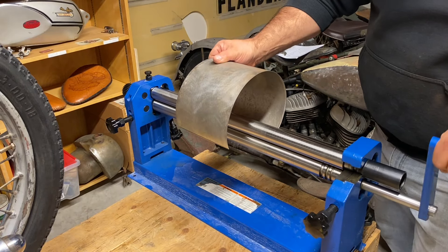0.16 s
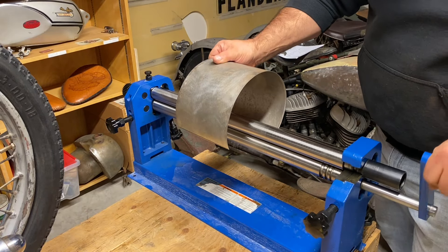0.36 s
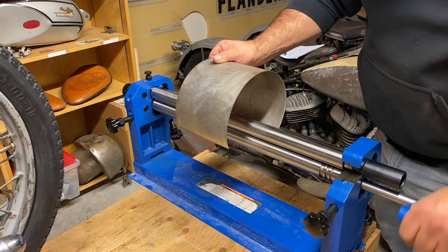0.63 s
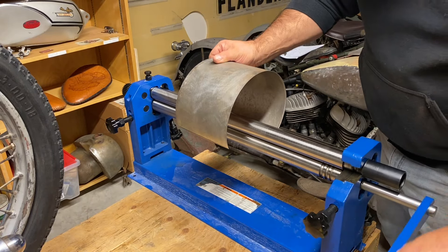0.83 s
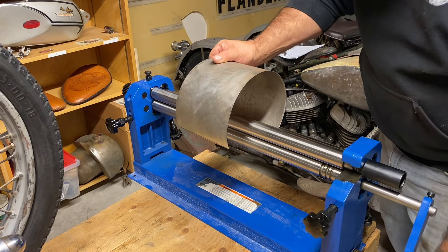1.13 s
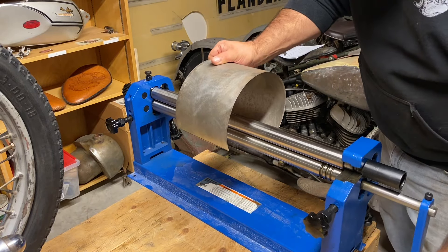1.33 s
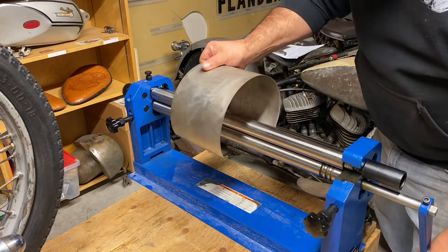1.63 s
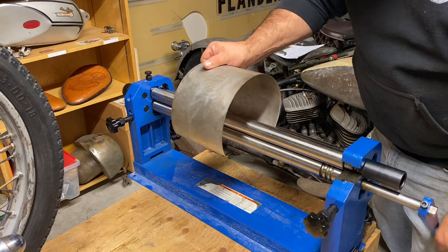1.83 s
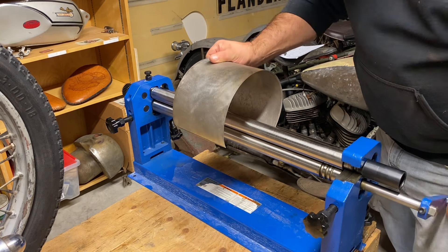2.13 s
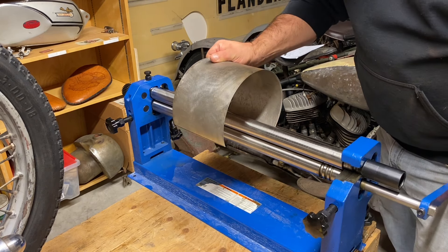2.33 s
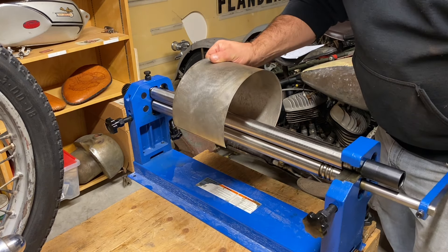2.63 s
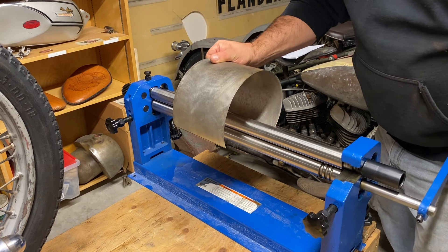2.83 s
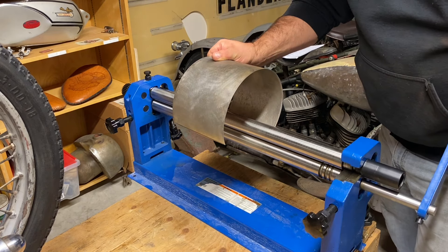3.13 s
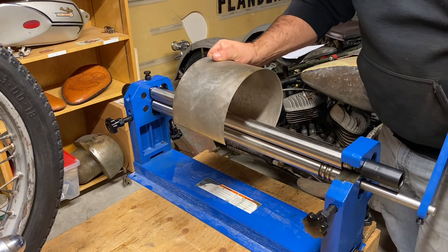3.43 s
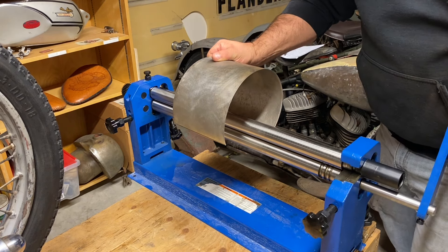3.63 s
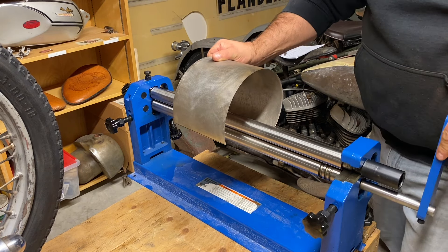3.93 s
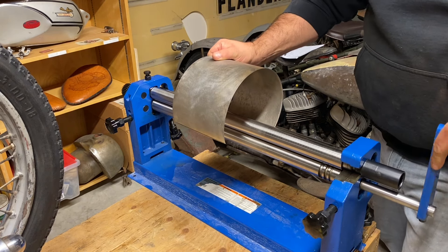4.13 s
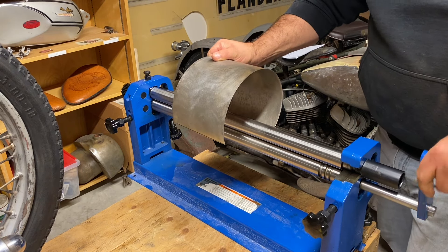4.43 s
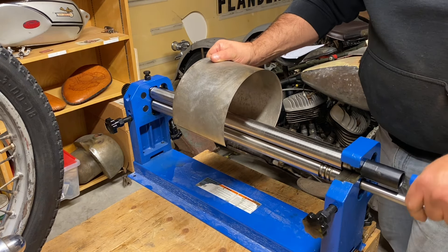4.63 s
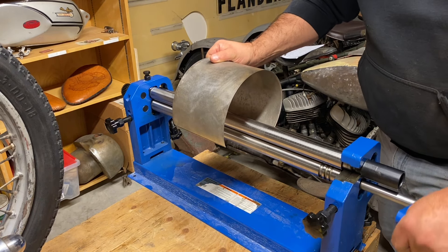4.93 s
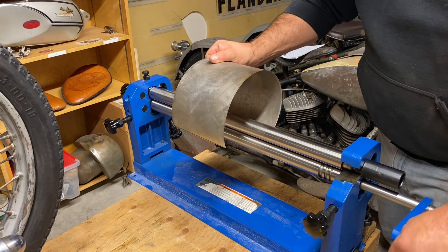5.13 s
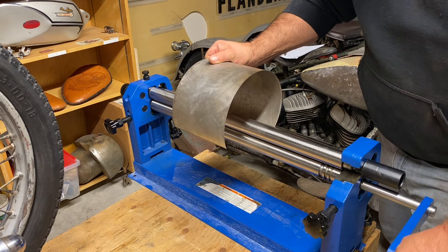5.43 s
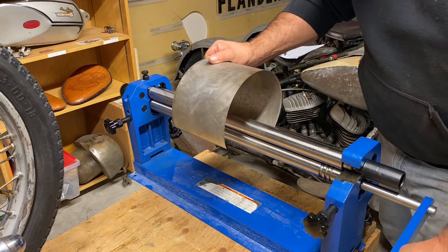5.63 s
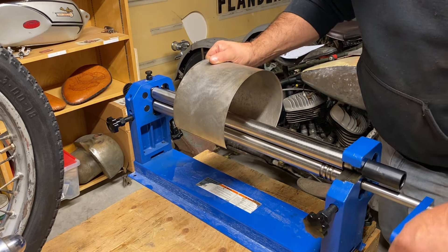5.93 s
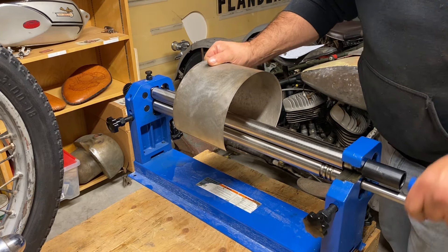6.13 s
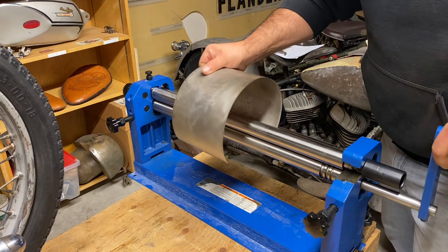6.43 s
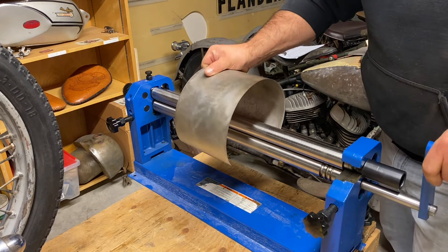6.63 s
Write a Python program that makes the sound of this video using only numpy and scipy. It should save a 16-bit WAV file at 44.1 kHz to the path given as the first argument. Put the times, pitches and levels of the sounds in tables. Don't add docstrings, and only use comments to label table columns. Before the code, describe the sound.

A close stereo pickup in a small, briefly reverberant workshop, with a low electrical hum around 120 Hz, faint motor whine and a soft bench rumble throughout. It opens with a click and dull jolt, then quiet rubbing and small ticks. From about 0.9 to 1.95 s comes a dense clatter: firm clacks, hollow thin-sheet knocks, boomy roller lurches and bright, dry edge rattles, thickest around 1.3 to 1.9. A faint tick at 2.1, then a medium clack and knock at 2.7. Between 3.5 and 5.5 s, isolated gear clicks and hollow thuds are spaced apart over soft palm hiss and hollow drumming. At 5.8 s the roller lurches hard with the loudest clack and a bright rattle. Sliding hiss and coarse scuffing rise around 6.0; a short gritty skid swells at 6.4 to 6.55, ending in a sharp click and light knock, then rubbing fades.

```python
import sys
import numpy as np
from scipy import signal
from scipy.fft import rfft, irfft, next_fast_len
from scipy.io import wavfile
from scipy.ndimage import uniform_filter1d, map_coordinates

SR = 44100
rng = np.random.default_rng(int(sys.argv[2]) if len(sys.argv) > 2 else 0)


def wav_out(sig):
    wavfile.write(sys.argv[1], SR, np.round(np.clip(np.atleast_2d(sig).T, -1, 1) * 32767).astype(np.int16))


def ratio_of_db(decibels):
    return 10 ** (np.asarray(decibels, float) / 20)


N = 298557
LEAD = 128

# start_s, peak_db, sizzle_db, ring_hz
GEAR_TEETH = [(0.0, -37.5, -24, 2040), (0.8927, -47, -6, 2230), (1.4273, -30, -20, 3000),
              (3.3034, -64.5, -14, 2030), (3.3987, -58.5, -42, 1850), (3.5353, -37, 0, 2420),
              (3.6724, -34, 3.5, 2440), (4.0351, -34, 1.5, 3090), (4.6854, -55.5, -8, 1730),
              (4.9392, -45.5, 1, 1628), (5.4445, -64, -21, 2630), (5.5648, -69, -18.5, 2090),
              (5.6083, -72, -29.5, 2460), (5.7985, -31.5, -26, 2180), (5.8236, -29.5, -5.5, 2120)]
# start_s, peak_db, ring_hz, edge_db, boom_db
SHEET_RAPS = [(0.983, -22, 288, -10.5, -11), (1.22, -44.5, 392, 3, 5.5), (1.359, -26, 335, -9, -6),
              (1.465, -31.5, 307, -14, -1.5), (1.52, -37.5, 249, -3, -17), (1.569, -55, 269, -16, -15),
              (1.603, -46, 367, 2, -10), (1.784, -52, 526, 11, 0), (1.904, -41.5, 444, 3.5, -5),
              (2.694, -32, 586, -1.5, -7), (3.534, -41.5, 566, 3.5, -7.5), (3.672, -37, 660, 3.5, -10),
              (4.044, -26.5, 354, -6.5, -4.5), (4.479, -30.5, 285, -19.5, -9.5), (4.938, -28, 274, -6, -17),
              (5.144, -35.5, 557, -39, -5.5), (5.445, -32, 366, -30.5, -6),
              (5.799, -20.5, 572, -14.5, -7.5), (6.551, -40, 487, -12, -13)]
# start_s, peak_db, ring_hz, edge_db, boom_db
FRAME_JOLTS = [(0.0, -33.5, 345, -7, 3.5), (0.475, -39, 294, -13.5, 2), (0.689, -44, 320, -16, 8),
               (0.741, -50.5, 307, -35, -3), (0.801, -62, 307, -24, 9), (1.294, -29, 350, -8, 0),
               (1.4, -34.5, 308.6, -31, -1), (1.93, -40.5, 228, -17, 3.5), (2.703, -31, 265, -27, 2.5),
               (3.862, -29, 286, -33, -6), (3.884, -44.5, 567, -9.5, -5), (4.079, -35.5, 567, -8.5, -3),
               (4.264, -47.5, 290, -33, 7.5), (4.691, -49, 307, -11, 4), (4.72, -56, 277, -17, -3),
               (6.466, -48.5, 580, 3, 4), (6.5, -41, 266, -3, -6)]
# start_s, peak_db, ring_hz, edge_db, boom_db
ROLLER_LURCHES = [
    (0.942, -31.5, 285, -12, 3.5),
    (1.019, -27, 283, -9.5, -6.5),
    (1.058, -32, 273, -8.5, 2.5),
    (1.436, -24.5, 289, -20, -2),
    (5.812, -24, 191, -30, 1),
    (5.843, -19, 356, -5.5, -4.5),
]


def unit(x):
    return x / np.sqrt(np.mean(x ** 2, -1, keepdims=True) + 1e-20)


def along(points, hz):
    f, v = np.transpose(points)
    return np.interp(np.log(hz + 1), np.log(f + 1), v)


def curves(rows):
    s, *cols = np.transpose(rows)
    return [np.interp(np.arange(N) / SR, s, c) for c in cols]


def wobble(rate):
    knots = rng.standard_normal(int(N * rate / SR) + 4)
    return map_coordinates(knots, [np.arange(N) * rate / SR])


def filtered(x, response):
    n = x.shape[-1]
    m = next_fast_len(n + 2048)
    return irfft(rfft(x, m) * response(np.fft.rfftfreq(m, 1 / SR)), m)[..., :n]


def peak(f, hz, width_hz):
    return 1j * f * width_hz / (hz * hz - f * f + 1j * f * width_hz)


def body(modes, f):
    total = 0
    for k, (hz, width_hz, db) in enumerate(modes):
        total = total + (-1) ** k * ratio_of_db(db + rng.normal(0, 2.48)) * peak(f, hz, width_hz)
    return total


def spread(pair, colour):
    # frequency_hz, likeness (0 to 1)
    likeness = [(60, 0.91), (150, 0.85), (300, 0.73), (600, 0.28), (1200, 0.072), (2400, 0.59),
                (5000, 0.67), (7500, 0.83), (8300, 0.94)]

    def response(hz):
        angle = np.arccos(np.clip(along(likeness, hz), -1, 1)) / 2
        return colour(hz) * [np.cos(angle), np.sin(angle)]

    mid, side = filtered(pair, response)
    return np.array([mid + side, mid - side])


def rush(spectrum, patchy_db):
    z = signal.stft(rng.standard_normal((2, N)), nperseg=512)[2]
    field = uniform_filter1d(rng.standard_normal(z.shape[1:]), 6, 0)
    field = uniform_filter1d(field, 10, 1)
    pair = signal.istft(z * ratio_of_db(patchy_db * unit(field)), nperseg=512)[1][:, :N]
    return unit(spread(pair, lambda hz: ratio_of_db(along(spectrum, hz))))


def struck(t, t60, blow):
    chatter = ratio_of_db(-60 * t / np.clip(t60, .003, 1)) * rng.standard_normal(len(t))
    chatter[0] = blow
    return np.array([chatter, t == 0])


def shudder(hits, under_db, t60):
    kicks, t = np.zeros(N), np.arange(SR) / SR
    for s, db, *_ in hits:
        kicks[round(s * SR)] = ratio_of_db(2 * (db + under_db))
    return np.sqrt(abs(signal.fftconvolve(kicks, ratio_of_db(-120 * t / t60))[:N]))


def add(out, s, hit, room_db):
    # frequency_hz, t60_s
    room_decay = [(100, 0.6), (500, 0.39), (2000, 0.34), (6000, 0.25), (14000, 0.13)]
    hz, t, z = signal.stft(rng.standard_normal((2, SR // 3)), SR, nperseg=256)
    tail = signal.istft(z * ratio_of_db(-60 * t / along(room_decay, hz)[:, None]), SR, nperseg=256)[1]
    tail = ratio_of_db(room_db) * tail / np.linalg.norm(tail[0])
    tail = np.pad(tail, ((0, 0), (LEAD + 90, 0)))
    sound = signal.fftconvolve(hit[1:], tail, axes=1)
    sound[0, LEAD:][:hit.shape[1]] += hit[0]
    sound[1, LEAD + 12:][:hit.shape[1]] += rng.uniform(-0.66, 0.87) * hit[0]
    start = round(s * SR)
    out[:, start:start + sound.shape[1]] += spread(sound, np.ones_like)


def hum():
    # pitch_hz, level_db
    motor_lines = [(2750, -92.5), (2880, -100.5), (269, -78.5), (367, -75)]
    hum_hz, hum_db = 119.7, -55
    phase = 2 * np.pi * np.cumsum(hum_hz + 1.5 * wobble(8.7)) / SR
    tone = ratio_of_db(hum_db + 0.43 * wobble(7.5)) * np.sin(phase)
    for line_hz, line_db in motor_lines:
        phase = 2 * np.pi * np.cumsum(line_hz + 8 * wobble(25)) / SR
        tone += ratio_of_db(line_db + 6.7 * wobble(40)) * np.sin(phase)
    return np.sqrt(2) * tone


def rubbing():
    # start_s, hiss_db, coarseness_db
    strokes = [(0.0, -96, 20), (0.32, -74.5, 3.5), (1.3, -65.5, 5.5), (1.43, -60.5, 9), (1.75, -76, 8),
               (1.9, -66.5, 4), (2.36, -73, 3.5), (2.69, -69.5, -1), (3.11, -79, 2), (3.39, -77.5, 4.5),
               (3.69, -70.5, 9.5), (3.81, -78, 9.5), (4.58, -76, -2), (5.62, -88, 8.5), (5.81, -77.5, 8.5),
               (5.98, -65, 11), (6.2, -67.5, 3.5), (6.77, -75, 8)]
    # frequency_hz, density_db
    hiss_colour = [(2800, -36), (3800, 0.5), (5000, -1), (7200, -1.5), (9000, 1.5), (11000, -3),
                   (13500, -5.5), (15500, -6), (16400, -38)]
    # frequency_hz, density_db
    scuff_colour = [(600, -32), (900, 4), (1100, -1.5), (1600, -5.5), (2300, -5), (3000, -8), (3800, -13.5),
                    (5000, -48.5)]
    # frequency_hz, density_db
    drum_colour = [(88, -41), (150, -11), (280, 2), (344, -4.5), (377, -4), (536, -5.5), (587, -6.5),
                   (898, -11.5), (1300, -37), (1690, -51), (2860, -120)]
    # frequency_hz, density_db
    rumble_colour = [(25, -26.5), (40, -10.5), (60, -1.5), (85, -3), (140, -3), (190, -22), (260, -51.5)]
    # pitch_hz, width_hz, level_db
    streaks = [(2270, 18, -14), (2860, 29, 3), (3980, 150, -0.5), (4650, 130, 2.5), (5950, 27, -4.5),
               (6980, 300, -1), (7770, 310, -7.5), (9350, 100, -15.5), (11100, 73, -1.5),
               (11570, 240, -6.5)]

    hiss_db, coarse_db = curves(strokes)
    hiss = np.hypot(ratio_of_db(hiss_db), shudder(GEAR_TEETH, under_db=-28, t60=0.83))
    sliding = hiss * rush(hiss_colour, patchy_db=1.1)
    sliding = sliding + ratio_of_db(hiss_db + coarse_db) * rush(scuff_colour, patchy_db=2.5)
    ringing = filtered(sliding, lambda f: 0.65 + 0.69 * abs(body(streaks, f)))

    curl_db = -63.5 + 0.53 * (hiss_db - hiss_db.mean())
    curl = np.hypot(ratio_of_db(curl_db), shudder(ROLLER_LURCHES + FRAME_JOLTS, under_db=-28.5, t60=0.55))
    drum = curl * ratio_of_db(0.41 * wobble(17)) * rush(drum_colour, patchy_db=3.0)

    bench = np.hypot(ratio_of_db(-59.5), shudder(FRAME_JOLTS + SHEET_RAPS, under_db=-23, t60=0.8))
    return ringing + drum + bench * rush(rumble_colour, patchy_db=5.0)


def skid():
    # frequency_hz, density_db
    skid_colour = [(300, -38), (1000, -7), (3000, -7.5), (5500, -3), (8000, -5), (12000, -10), (15600, -8),
                   (16500, -49.5)]
    start_s, top_s, end_s, top_db = 6.372, 6.462, 6.548, -44
    rise_db, fall_db, bend = 17, 24, 1.7
    t = np.arange(N) / SR
    sounding = (t > start_s) & (t < end_s)
    away = np.interp(t, [start_s, top_s, end_s], [1, 0, 1])
    level_db = top_db - np.where(t < top_s, rise_db, fall_db) * away ** bend
    grit = ratio_of_db(2.5 * wobble(300) + 1.5 * wobble(60))
    return sounding * ratio_of_db(level_db) * unit(grit * rush(skid_colour, patchy_db=1.2))


def knocks():
    # pitch_hz, width_hz, level_db
    sheet_modes = [(280.5, 31, -2.5), (364, 20, -3), (435.7, 74, -5), (475, 83, -7.5), (552, 85, -7),
                   (699.6, 29, -8), (726, 49, -4.5)]
    # pitch_hz, width_hz, level_db
    bench_modes = [(62.6, 25, -2.5), (93, 116, -7.5), (137.2, 27, -0.5), (151, 84, -18)]
    out, t = np.zeros((2, N + SR)), np.arange(SR // 5) / SR

    def dull(f):
        return 1 / (1 + 1.1j * f / 720 - (f / 720) ** 2) ** 3

    def knock(s, db, ring_hz, edge_db, boom_db, boom_hz):
        def curl(f):
            return (0.83 * body(sheet_modes, f) + peak(f, ring_hz, 44)) * peak(f, 430, 710) * dull(f)

        def bench(f):
            late = np.exp(-2j * np.pi * f * .008)
            return body(bench_modes, f) * peak(f, boom_hz, 110) ** 2 * late * dull(3 * f)

        sheet = unit(filtered(struck(t, 0.037, blow=15), curl))
        edge = unit(filtered(struck(t, 0.16, blow=7.2), lambda f: peak(f, 872, 1270) ** 3))
        boom = unit(filtered(struck(t, 0.074, blow=48), bench))
        hit = sheet + ratio_of_db(edge_db) * edge + ratio_of_db(boom_db) * boom
        add(out, s, ratio_of_db(db - 18.5) * hit, room_db=-3)

    for hits, boom_hz in [(SHEET_RAPS, 140), (FRAME_JOLTS, 128), (ROLLER_LURCHES, 65.3)]:
        for row in hits:
            knock(*row, boom_hz)
    return out[:, LEAD:LEAD + N]


def clicks():
    # pitch_hz, width_hz, level_db
    roll_modes = [(1020, 76, 7), (1420, 25, -11.5), (2050, 34, 2), (2300, 67, 4), (2970, 62, -4),
                  (3040, 94, -14.5), (3140, 13, 0.5), (3660, 53, -5.5), (4240, 40, -2), (4390, 27, -18),
                  (5070, 62, -14), (5650, 25, -3), (6630, 32, -8), (7320, 66, -8)]
    # start_s, peak_db, sizzle_db, ring_hz
    clacks = [
        (0.2658, -66, -25, 2880),
        (0.4745, -48, -12, 2300),
        (0.9806, -24.5, -21, 3020),
        (1.291, -35, -27.5, 2430),
        (1.3543, -27, -26.5, 2470),
        (1.6544, -34.5, -15, 2020),
        (2.695, -34, -18, 3040),
        (5.5805, -58, -28, 1210),
        (5.598, -65, -27, 2180),
        (5.8467, -19, -20, 2860),
    ]
    # start_s, peak_db, sizzle_db, ring_hz, ring_db
    rattles = [(0.729, -69, 17.5, 2750, 10), (0.9383, -46.5, -1, 1640, -5), (1.0264, -34, -1, 4480, -3.5),
               (1.2205, -38, 7, 2220, 6.5), (1.282, -25, -10.5, 4200, -5.5), (1.327, -43, -8, 4440, 0),
               (1.4153, -57, -7, 3955, -1), (1.4675, -23, 8, 2260, -0.5), (1.4746, -21.5, 7, 3140, 3),
               (1.524, -37, 5, 2230, -0.5), (1.6006, -25.5, 7.5, 2020, 4.5),
               (1.6425, -30.5, -0.5, 2050, 2.5), (1.7875, -36, 11.5, 2020, 1),
               (1.8452, -34.5, 8.5, 4000, -4), (1.8728, -29, -2, 3500, -1.5), (1.894, -38, -18, 2060, 4),
               (1.9102, -33, 3.5, 1890, 1), (2.1233, -54.5, -8, 4220, -0.5), (5.88, -28, -12, 2900, -5.5),
               (6.553, -28, -2, 4800, 0)]
    out, t = np.zeros((2, N + SR)), np.arange(SR // 10) / SR
    flex = [(hz, 45, 0) for hz in np.sort(rng.uniform(1100, 9000, size=28))]

    def click(s, db, sizzle_db, ring_hz, ring_db, room_db):
        def cracking(f):
            broad = peak(f, 2230, 3500) ** 3 + ratio_of_db(sizzle_db + 3.5) * peak(f, 4480, 9900) ** 2
            return broad * (1 + 2.12 * body(flex, f))

        def rolls(f):
            snap = (.7 + .4 * peak(f, ring_hz, 110)) * peak(f, ring_hz, 1300) ** 2
            return snap + 0.56 * body(roll_modes, f) * peak(f, ring_hz, 2400)

        crack = unit(filtered(struck(t, 0.025, blow=1.1), cracking))
        ring = unit(filtered(struck(t, 0.017, blow=1.8), rolls))
        crack_db = db - 24.5 + 10 * np.log10(1 + ratio_of_db(2 * sizzle_db))
        add(out, s, ratio_of_db(crack_db) * crack + ratio_of_db(db - 24.5 + ring_db) * ring, room_db)

    for row in clacks:
        click(*row, ring_db=4.5, room_db=-9.5)
    for row in rattles:
        click(*row, room_db=-8.5)
    for row in GEAR_TEETH:
        click(*row, ring_db=-7, room_db=2)
    return out[:, LEAD:LEAD + N]


def scene():
    return hum() + rubbing() + skid() + knocks() + clicks()


def roll_off(x):
    return signal.sosfilt(signal.butter(12, 16590, fs=SR, output="sos"), x)


def record(dry):
    # frequency_hz, level_db
    top_end = [(12000, 1.5), (14500, -5), (15600, -4.5), (15850, -14.5), (16400, -30.5), (16700, -48)]
    # frequency_hz, left_over_right_db
    balance = [(60, -0.4), (150, 1), (380, 0.5), (950, 1), (2380, 3.5), (5980, 4), (15000, -3.5)]
    # frequency_hz, left_lead_rad
    widening = [(0, 0), (7250, 0), (8700, -3), (9500, -3.5), (10900, -6.2), (11600, -6.5), (13000, -9.4),
                (13750, -9.55), (14600, -12.45), (16500, -12.6)]
    half = np.array([[.5], [-.5]])

    def microphones(hz):
        gain = ratio_of_db(along(top_end, hz) + half * along(balance, hz))
        return gain * np.exp(1j * half * along(widening, hz))

    return roll_off(filtered(dry, microphones))


dry = scene()
out = record(dry)
wav_out(out)
```